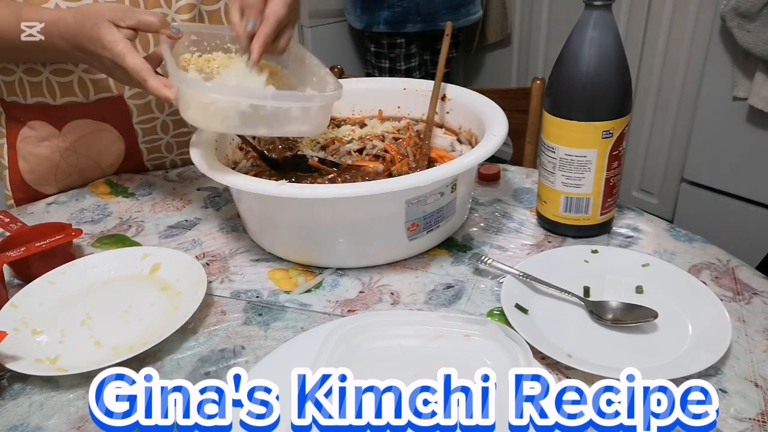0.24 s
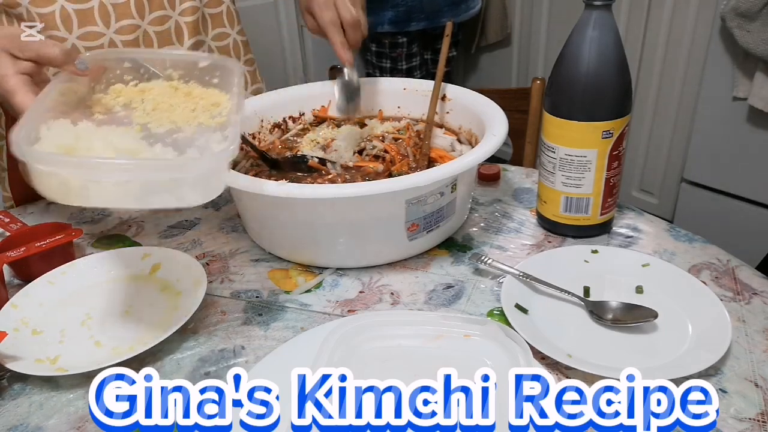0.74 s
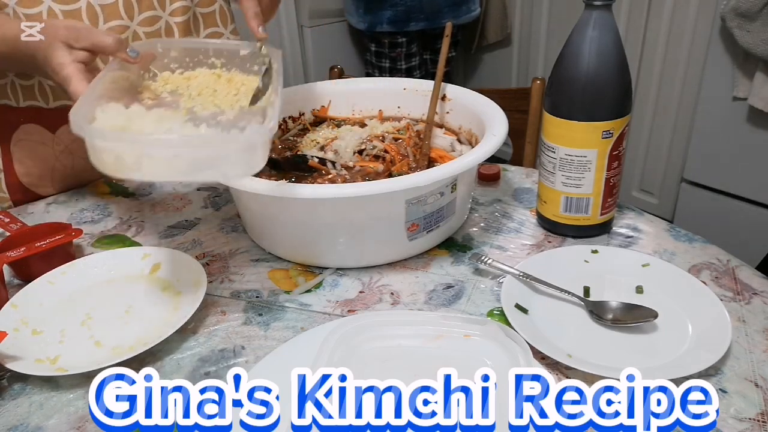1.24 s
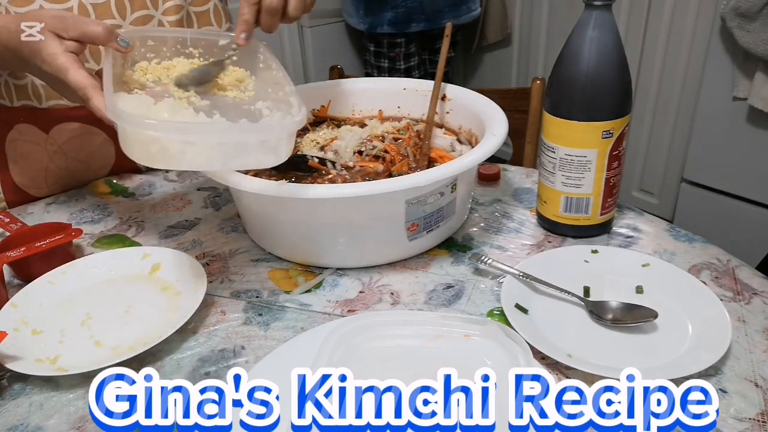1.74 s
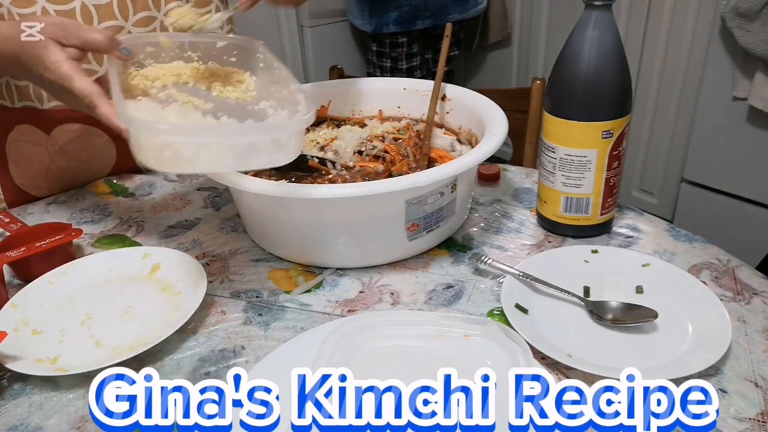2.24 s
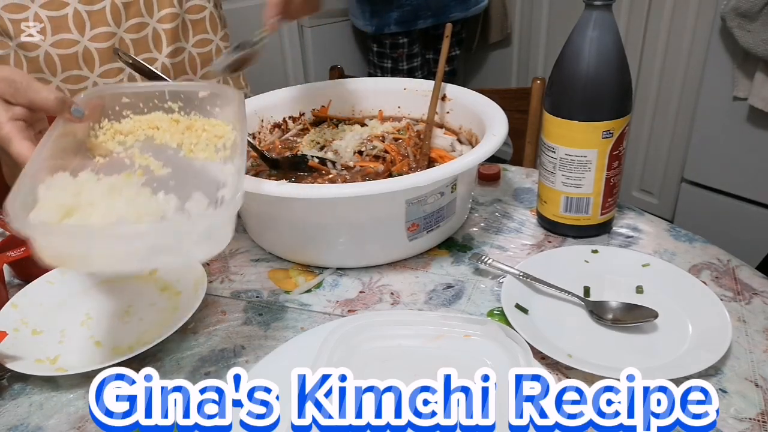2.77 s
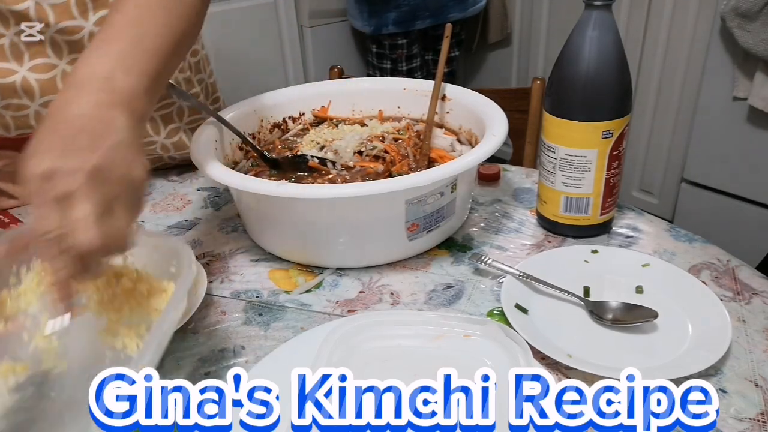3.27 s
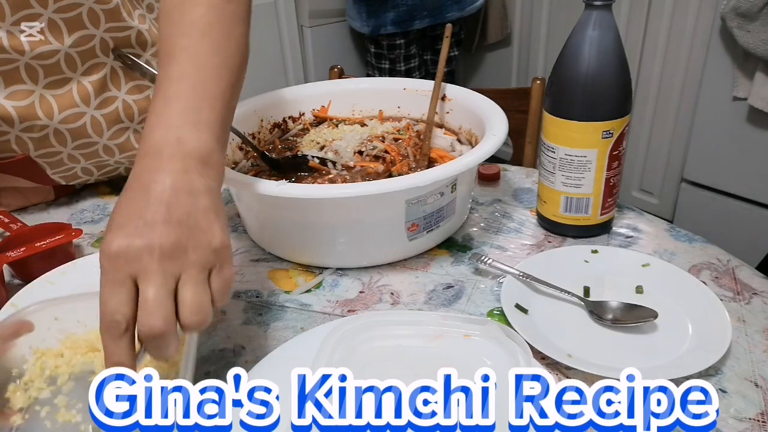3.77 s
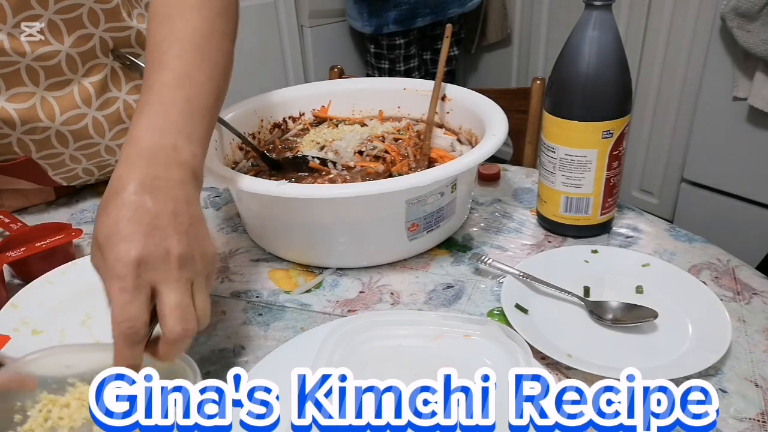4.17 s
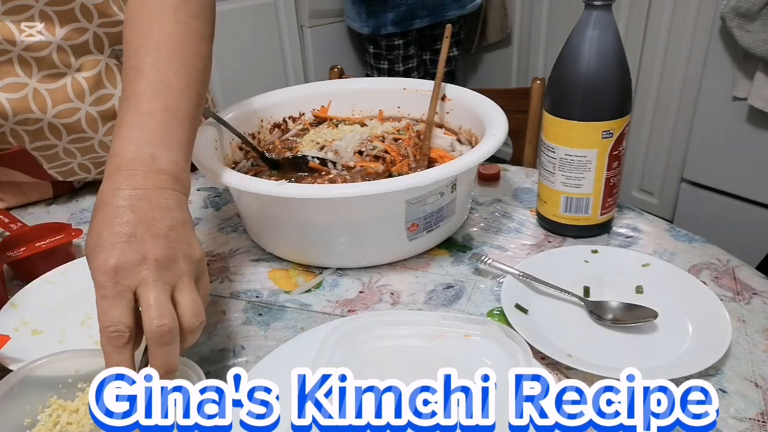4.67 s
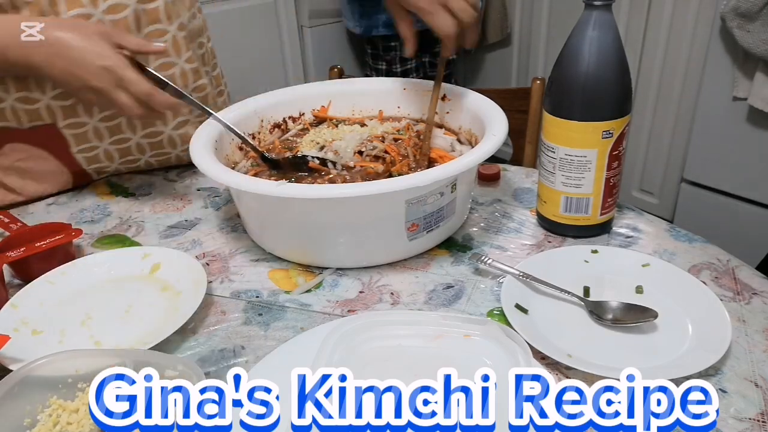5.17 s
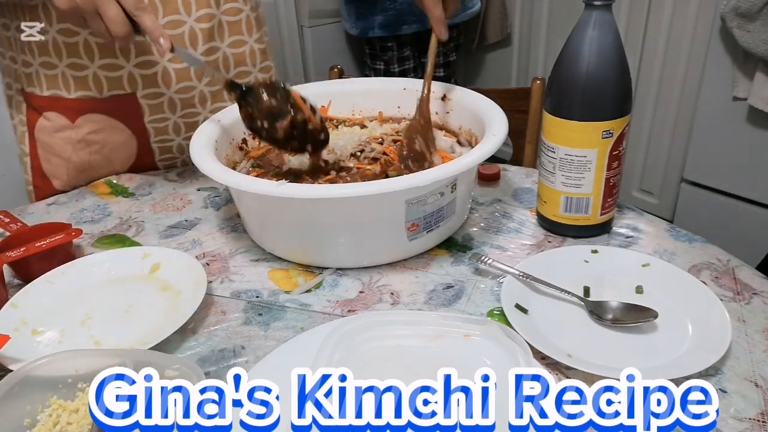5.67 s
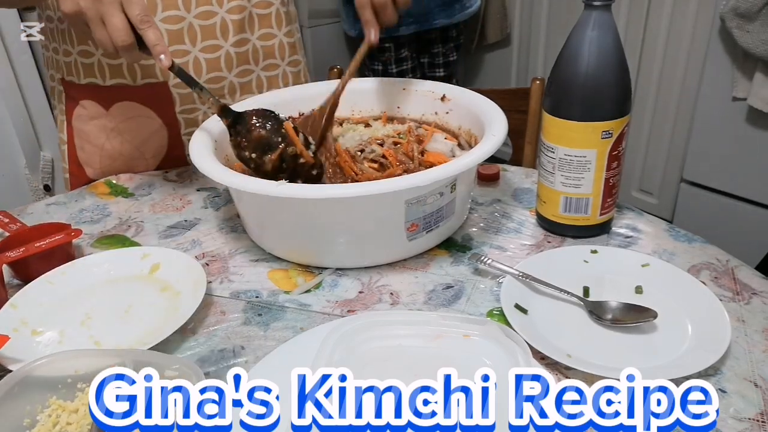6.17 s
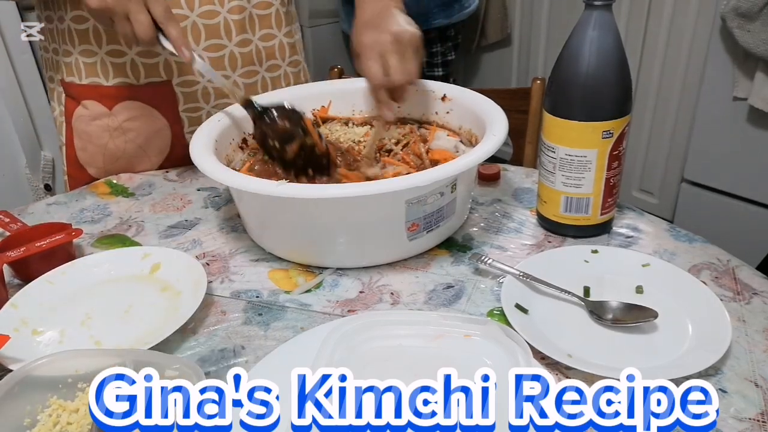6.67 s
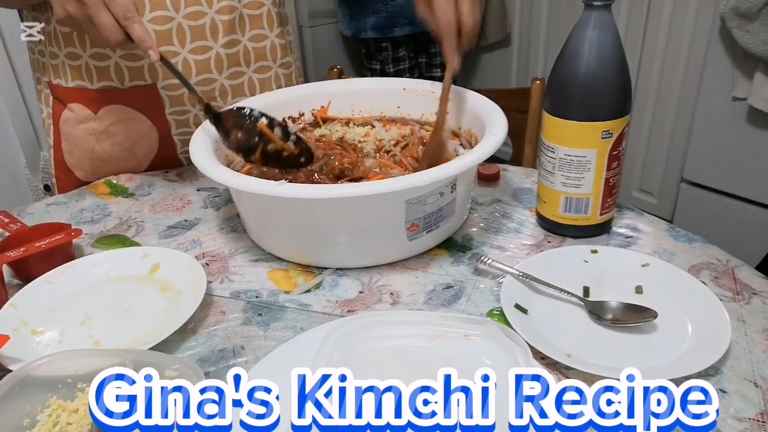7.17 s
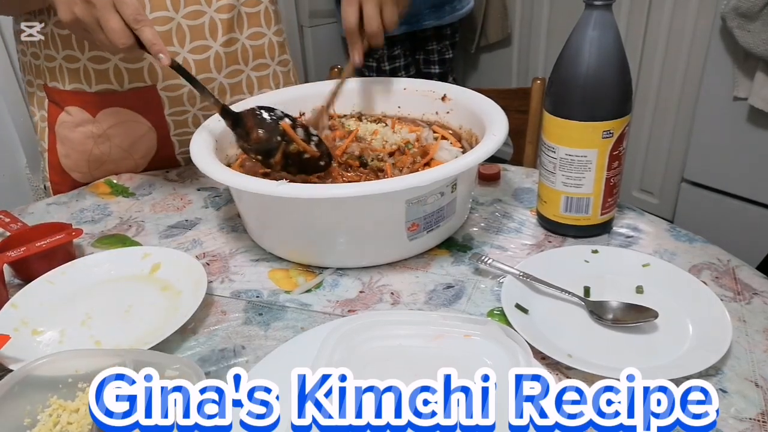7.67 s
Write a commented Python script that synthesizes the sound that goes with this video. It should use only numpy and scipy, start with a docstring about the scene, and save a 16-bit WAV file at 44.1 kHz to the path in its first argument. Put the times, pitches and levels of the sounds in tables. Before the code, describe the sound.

Close in a small home kitchen, a spoon knocks a light plastic tub, with one strong tap early on and small scrapes between. The tub is then set down with a rapid cluster of hard, hollow clacks and slides. After a quieter moment and a soft table nudge, spoons stir wet vegetables in a plastic basin with muted knocks, faint squeaks and tiny ticks. A very low hum stays underneath.

```python
"""A small kitchen: a spoon taps and scrapes a plastic tub, the tub is set down and slid on a cloth-covered
table, then two spoons turn wet vegetables in a plastic basin, over a very low motor hum.
Hits are short decaying pulses with ringing walls, table, plate and spoon; scrapes are dense slips dealt to
resonances; wet rustle is crackling noise; squeaks are rough gliding tones; echoes are noise tails."""
import sys
import numpy as np
from scipy import signal
from scipy.fft import rfft, irfft
from scipy.io import wavfile

SR = 44100
rng = np.random.default_rng(int(sys.argv[2]) if len(sys.argv) > 2 else 0)


def generate_wav(signal):
    """Clip the signal to [-1, 1] and save it as 16-bit WAV at the path in sys.argv[1]."""
    frames = np.transpose(np.atleast_2d(signal))
    scaled = np.clip(frames, -1, 1) * 32767
    pcm = np.round(scaled).astype(np.int16)
    wavfile.write(sys.argv[1], SR, pcm)


N = 349272  # length in samples

# Background. Colour of the room air: f/Hz, relative level/dB
AIR_COLOUR = [(21, -29.5), (35, -7.5), (57, -9.5), (81, -16), (149, -17), (212, -25), (310, -24.5),
              (489, -26), (1050, -26.5), (2020, -29), (3500, -34.5), (5700, -39.5), (9800, -44),
              (15000, -49)]
# Left-right likeness of the air (1 same, 0 unrelated, -1 opposite): f/Hz, likeness
AIR_LIKENESS = [(60, 0.5), (180, -0.088), (540, 0.27), (1620, -0.35), (4850, 0.081), (14600, -0.11)]
# The drone swells and sinks: t/s, level/dB
DRONE_SWELL = [(0, -72.5), (1.3, -73.5), (2.0, -73.5), (2.8, -69.5), (4.6, -77), (5.3, -66.5), (6.2, -73),
               (6.7, -72), (7.2, -76), (7.6, -71)]
AIR_DB = -64
HUM_HZ, HUM_DB, HUM_SIDE_RAD = 29.4, -56.5, 0.2
DRONE_HZ, DRONE_WIDTH_HZ, DRONE_OCTAVE_DB = 146.9, 9.7, -9  # a wider band wavers faster

# Decay of the kitchen echoes: f/Hz, t60/s
KITCHEN_DECAY = [(150, 0.54), (500, 0.2), (1000, 0.22), (2000, 0.22), (4000, 0.2), (10000, 0.14)]
KITCHEN_DB, KITCHEN_GAP_S = -2, 0.004
EARLY_T60_S, EARLY_DB = 0.035, 1.5  # nearby table top and dishes: echoes that die fast
KITCHEN_TURN_S = 0.23  # time to fade from one random echo tail to the other, so no single colour lingers

# The table is nudged: t/s, push level/dB
BUMP_HITS = [(5.27, -48), (5.37, -50), (5.9, -48), (5.97, -48.5)]
BUMP_HZ, BUMP_T60_S = 65, 0.24
TABLE_HZ, TABLE_T60_S = 138, 0.39

# Modes of a plate under the tub: f/Hz, level/dB, t60/s
PLATE_MODES = [(2665, -3, .03), (3150, -6, .025), (4270, -7, .018), (5250, -8, .03)]
# Blows on the plate: t/s, level/dB, extra level of every second mode/dB (depends on where it is struck)
PLATE_BLOWS = [(3.641, -26.5, -13), (3.906, -49.5, 9)]
# Modes of the metal spoon: f/Hz, level/dB, t60/s
SPOON_MODES = [(2480, 5, 0.027), (3520, 0.5, 0.042)]
# Spoon clinks: t/s, level/dB
SPOON_CLINKS = [(0.027, -43.5), (6.841, -62)]
# The tub rocks and its floor rings: t/s, level/dB, f/Hz, decay/cycles
TUB_RATTLES = [(1.863, -53, 1524, 3.7), (2.284, -43, 1520, 1.7), (2.394, -51, 1500, 3.5),
               (3.3328, -39, 950, 0.9), (3.339, -48, 2000, 0.77), (3.3, -43, 1490, 1.7),
               (3.641, -20, 1124, 1.14), (3.644, -37, 1950, 2.4), (3.987, -28.5, 1020, 0.87),
               (4.015, -17, 1180, 1.06), (4.033, -26.5, 2080, 2.4), (4.048, -30, 1060, 1.8),
               (4.056, -40, 1900, 1.3), (4.084, -47, 696, 1.1), (4.106, -51, 1180, 1),
               (4.11, -42, 4350, 3.5), (4.175, -55, 1270, 1.7), (4.323, -38, 1320, 1.3),
               (4.436, -20.5, 1340, 0.56), (5.137, -50, 1370, 4.1), (6.36, -37, 3000, 0.57),
               (6.566, -40, 1650, 3.7), (6.84, -50, 3140, 2.8), (6.84, -44, 3870, 2.3),
               (6.856, -58, 3500, 2.5)]

# A sliding spoon holds one resonance: start t/s, length/s, level/dB, start f/Hz, end f/Hz
SPOON_SQUEAKS = [(0.607, 0.064, -78, 1550, 1450), (4.116, 0.027, -54.5, 2090, 2150),
                 (4.83, 0.037, -69, 944, 1130), (4.904, 0.11, -71.5, 1350, 1390),
                 (5.037, 0.053, -63.5, 1358, 1410), (5.18, 0.032, -65.5, 1400, 1410),
                 (5.03, 0.1, -74, 2140, 1990), (5.172, 0.053, -69, 2160, 2240),
                 (6.084, 0.082, -70, 1010, 1043), (6.137, 0.029, -73, 2490, 2424),
                 (6.198, 0.02, -69, 1597, 1660), (6.44, 0.16, -70, 2100, 2030),
                 (6.6, 0.092, -71, 1616, 1550), (6.738, 0.092, -75, 2930, 3000)]
SQUEAK_POLE_WIDTH_HZ, SQUEAK_EDGE_S = 190, 0.0093

# Tiny bright ticks, alone or on the edge of knocks and scuffs: t/s, level/dB, f/Hz
TINY_POPS = [(0.799, -40, 8750), (0.805, -48.5, 3800), (0.812, -38, 10500), (1.591, -47.5, 6500),
             (2.57, -56.5, 5430), (3.339, -38.5, 5350), (3.343, -40.5, 9000), (4.015, -28.5, 3940),
             (4.033, -36, 4450), (4.307, -41, 5800), (4.313, -42, 5200), (4.322, -32.5, 5700),
             (4.332, -35.5, 5200), (4.436, -40, 4800), (4.45, -50, 5200), (5.972, -52.5, 3300),
             (5.972, -51, 8000), (6.146, -53, 2420), (6.321, -54, 6600), (6.453, -53, 5350),
             (6.571, -32.5, 5200), (6.6543, -48, 5050), (6.733, -50.5, 3000), (6.818, -59, 6000),
             (6.84, -40, 3770), (7.013, -56.5, 3550), (7.1302, -57.5, 7600), (7.372, -51, 6500),
             (7.447, -53.5, 5500), (7.49, -50, 4640), (7.573, -48, 9900)]
POP_SPLINTER_S = 0.0069

# Spoon strokes and drags: start t/s, length/s, scrape level/dB, scrape centre at start f/Hz, wet rustle level/dB
SPOON_STROKES = [(-0.005, 0.014, -66.5, 2420, -65), (0.429, 0.12, -69, 900, -85),
                 (0.624, 0.097, -71, 1670, -73), (0.882, 0.07, -65.5, 2000, -70),
                 (1.153, .07, -71.5, 2170, -77), (1.227, 0.011, -64, 760, -68),
                 (1.445, 0.17, -81, 766, -67.5), (1.586, 0.047, -85, 1000, -72),
                 (1.76, 0.19, -74, 1200, -73.5), (2.184, 0.023, -79, 1470, -62.5),
                 (2.576, 0.12, -73.5, 683, -73.5), (2.83, 0.15, -72.5, 1470, -78),
                 (3.08, 0.03, -69, 705, -68), (3.299, 0.039, -60, 1010, -59),
                 (3.757, 0.031, -62, 1050, -75), (3.79, 0.035, -66, 1510, -71), (3.94, .1, -56, 1140, -61),
                 (4.035, 0.029, -46, 1500, -54), (4.293, 0.057, -63, 1040, -61.5),
                 (4.816, 0.23, -68.5, 790, -79.5), (5.013, 0.18, -66.5, 1400, -72),
                 (5.299, 0.097, -62.5, 1430, -66), (5.93, 0.063, -64.5, 1110, -68.5),
                 (6.082, 0.15, -73.5, 960, -72), (6.434, 0.12, -68, 2300, -67),
                 (6.57, 0.033, -61, 1500, -59.5), (6.648, 0.025, -64, 2400, -72),
                 (6.741, 0.048, -63, 730, -72.5), (6.835, 0.036, -63.5, 720, -67.5),
                 (7.203, 0.18, -74.5, 1070, -70.5), (7.436, 0.11, -85, 1540, -70),
                 (7.668, 0.15, -78, 1540, -77), (7.83, 0.067, -74, 716, -71)]
# Colour of the wet rustle: f/Hz, relative level/dB
RUSTLE_COLOUR = [(1500, -7), (2500, 3), (3600, -7), (4800, -3.5), (6500, -3.5), (9800, -6), (15000, -18)]
STROKE_RISE_DB_PER_S, STROKE_FALL_DB_PER_S = 271, 132
STROKE_GLIDE_OCTAVES_PER_S = 0.93  # the centre climbs as the spoon travels up the wall
SLIP_CYCLES = 20  # t60 of each slip resonance, in its own cycles
SLIP_FOCUS_DB, SLIP_BROAD_DB = -25, -13  # fall per squared octave from the centre, and its floor
# Faint fumbling between strokes
HANDLING_DB, HANDLING_RUSTLE_DB, HANDLING_HZ, HANDLING_WAVER_DB = -92.5, -82.5, 1200, 3

# Clear blows: t/s, level/dB, wall f/Hz, then relative to that level: table thump level/dB,
# clack level/dB, bright edge level/dB
KNOCK_CONTACTS = [(0.027, -60.5, 392, 6, 9, 6.5), (0.409, -42, 1260, -37, -29, -46),
                  (0.478, -41.5, 1110, -41, -34, -51), (1.221, -20, 755, -52, -29, -58),
                  (1.429, -34.5, 606, -38, -9.5, -16.5), (1.86, -54, 1020, -16, -2.5, -10.5),
                  (2.281, -56.5, 1290, -33, 4, -50), (2.391, -46.5, 950, -37, -20, -43),
                  (3.082, -38, 500, -45, -22, -33.5), (3.164, -34.5, 705, -54, -5, -12),
                  (3.529, -39.5, 880, -49, -17.5, -34), (3.636, -33.5, 910, -1, -3, -17.5),
                  (3.64, -31.5, 1130, -17.5, -1.5, -45), (3.71, -24.5, 930, -17.5, -23, -35),
                  (3.835, -44.5, 1050, -16, -16, -29), (3.87, -48, 1260, -19, -17, -36.5),
                  (3.906, -36.5, 1170, -9.5, -3, -16.5), (3.951, -30.5, 1130, -18, -23, -51),
                  (3.979, -33.5, 1200, -8.5, -26, -23.5), (4.0155, -31, 1160, -24, -7, -31),
                  (4.032, -38, 560, -41, 7, -31), (4.056, -33.5, 583, -8, 1, -32),
                  (4.227, -46, 366, -1.5, -10.5, -38), (4.275, -48.5, 760, -33, -7.5, -27),
                  (4.4355, -24.5, 620, -29.5, -23, -46), (5.135, -40.5, 1250, -38, -20, -34.5),
                  (5.299, -49, 1080, -8, -7, -37), (5.325, -50.5, 1310, 1, -6, -22),
                  (5.9, -39.5, 427, -10, -13, -30), (6.198, -52.5, 650, -21, -8, -32),
                  (6.734, -36.5, 664, -31, -15, -33), (6.805, -40.5, 510, -17.5, -34, -42),
                  (6.839, -42, 523, -49, -29, -13), (7.276, -70.5, 790, -27, 6, 2)]
# Scuffs, where the contact drags on: the same columns as the clear blows
SCUFF_CONTACTS = [(0.437, -47.5, 636, -45, -21, -53), (0.679, -55.5, 1360, -40, 1.5, -39),
                  (0.892, -50.5, 775, -13.5, -28, -18), (0.921, -59.5, 1320, -15, 9.5, -15),
                  (1.235, -53, 743, -44, 3, -3.5), (1.768, -60.5, 1420, -22, 4, -19),
                  (2.239, -48, 1050, -33, -36, -32), (3.297, -53, 1200, -27, 6, -5.5),
                  (3.334, -39, 910, -25, -12, -23), (3.483, -54.5, 695, -42, -4, -15.5),
                  (3.986, -28, 800, -23, -11, -49), (4.02, -29.5, 1200, -10.5, -13, -32),
                  (4.07, -33.5, 1060, -44, -18, -26), (4.11, -42.5, 1100, -24, -12, -16),
                  (4.15, -49.5, 1200, -26, -10, -13), (4.303, -40, 990, -47, -4, -12.5),
                  (4.319, -38.5, 770, -2, -2.5, -30), (4.813, -53.5, 1100, -15, -13, -27),
                  (5.276, -50.5, 1100, -31, -2.5, -14.5), (5.969, -63, 1110, 5, -14, -12),
                  (6.563, -39, 1850, -20, -29, -13.5), (7.894, -52, 443, -13, -17, -34)]
# Plastic walls of the tub: f/Hz, relative level/dB, t60/s
TUB_WALLS = [(420, -1.5, 0.017), (564, -6, 0.04), (782, -14, 0.028), (951, -5, 0.022), (1250, -5, 0.018),
             (1830, -6, 0.02), (2400, -5, 0.018), (3000, -5, 0.016)]
# The work moves from the tub on the left to the basin: t/s, left minus right level/dB
WORK_PLACE = [(0, 0.5), (1.3, 0.9), (3.3, 1.3), (4.0, 1.5), (4.3, 0.5), (5.1, 10.5), (5.4, -1.5), (6.0, -2),
              (7.92, -3)]
LAG_SAMPLES = 4
REBOUND_S, SCUFF_S = 0.016, 0.035
# A stronger clack is a harder contact and sits higher
CLACK_HZ, CLACK_KNEE_DB, CLACK_OCTAVES_PER_DB = 1496, -5, 0.065
SNAP_HZ, TICK_HZ = 3690, 5730  # the two pulses of the bright edge
# The shorter a pulse, the higher it stands over its band level
CLACK_CREST_DB, SNAP_CREST_DB, TICK_CREST_DB = 14.5, 19, 26

# Response of the microphone: f/Hz, level/dB
MICROPHONE_RESPONSE = [(5500, -0.5), (7000, -3), (8300, -5), (9800, -1), (11500, -5), (15000, -9.5)]
CUTOFF_HZ = 15500


def from_db(db):
    """Decibels to gain."""
    return 10 ** (np.asarray(db) / 20)


def rms_one(x):
    """Scale to rms 1."""
    return x / np.sqrt(np.mean(x ** 2) + 1e-20)


def at_hz(points, hz):
    """Read a table on a log-frequency axis."""
    points = np.array(points)
    return np.interp(np.log(hz), np.log(points[:, 0]), points[:, 1])


def over_time(points, t):
    """Read a table of time and level."""
    return np.interp(t, *np.transpose(points))


def spectrum_hz():
    """Frequencies of the full-length spectrum, held above 10 Hz for the log axis."""
    return np.maximum(np.arange(N // 2 + 1) * SR / N, 10)


def drift(rate):
    """Slow random wander of rms 1: smoothed noise, drawn every 40 samples."""
    r = np.exp(-80 * np.pi * rate / SR)
    noise = rng.standard_normal(N // 40 + 2002)
    slow = signal.lfilter([1], [1, -2 * r, r * r], noise)[2000:]
    return np.interp(np.arange(N) / 40, np.arange(len(slow)), rms_one(slow))


def ring(x, hz, t60):
    """A resonance: a unit click sets a decaying sine of about height 1 ringing."""
    r, w = from_db(-60 / (t60 * SR)), 2 * np.pi * hz / SR
    return signal.lfilter([0, np.sin(w)], [1, -2 * r * np.cos(w), r * r], x + 1e-18)


def coloured(x, spectrum):
    """Give a signal the colour of a spectrum; rms 1."""
    return rms_one(irfft(rfft(x) * from_db(at_hz(spectrum, spectrum_hz())), N))


def pair(likeness):
    """Two channels of noise, mixed from mid and side for the given likeness per frequency."""
    alike = np.clip(at_hz(likeness, spectrum_hz()), -1, 1)
    mid, side = rfft(rng.standard_normal((2, N)))
    return irfft(np.sqrt(1 + alike) * mid + np.sqrt(1 - alike) * side * [[1], [-1]], N)


def grains(per_s, spread_db):
    """Random clicks of uneven size, in clumps."""
    sizes = from_db(spread_db * np.minimum(rng.exponential(1, N), 4))
    signs = rng.choice([-1, 1], N)
    chance = per_s * from_db(4.0 * drift(20)) / SR
    return sizes * signs * (rng.random(N) < chance)


def pulse(hz, cycles):
    """A contact of a few cycles with a soft start; height 1."""
    turns = np.arange(600) * hz / SR
    shape = -turns * np.exp(-turns / cycles) * np.sin(2 * np.pi * turns)
    return shape / np.abs(shape).max()


def strikes(hits):
    """A click train from rows of time and level."""
    clicks = np.zeros(N)
    for s, level_db in hits:
        clicks[round(s * SR)] = from_db(level_db)
    return clicks


def scatter(late, strength, length_s):
    """Small clicks strewn over a time, swelling quickly and fading; one at the very start stays whole."""
    clicks = np.zeros(4000)
    swell = np.where(late > 0, np.minimum(late / 0.072, 1), 1)
    at = np.clip(late * length_s * SR, 0, 3999).astype(int)
    np.add.at(clicks, at, strength * swell * np.exp(-1.5 * late))
    return clicks


def side_gains(s, level_db):
    """Left and right gain of a sound made where the work is at that moment."""
    return from_db(level_db + np.array([[.5], [-.5]]) * over_time(WORK_PLACE, s))


def hum():
    """A very low, nearly steady motor tone: one sine, shifted in phase between the sides."""
    side = HUM_SIDE_RAD * np.array([[1], [-1]])
    tone = np.sin(2 * np.pi * HUM_HZ * np.arange(N) / SR + side)
    return from_db(HUM_DB + .5 * drift(0.76)) * np.sqrt(2) * tone


def drone():
    """A wavering drone near the hum's fifth and tenth multiples: noise driving two narrow resonances."""
    out = 0
    for octave in range(2):
        noise = rng.standard_normal(N)
        band = ring(noise, DRONE_HZ * 2 ** octave, 2.0 / DRONE_WIDTH_HZ)
        out = out + from_db(octave * DRONE_OCTAVE_DB) * rms_one(band)
    return out * from_db(over_time(DRONE_SWELL, np.arange(N) / SR))


def air():
    """The air of the room: coloured stereo noise that drifts slightly in level."""
    return from_db(AIR_DB + 1.0 * drift(0.59)) * coloured(pair(AIR_LIKENESS), AIR_COLOUR)


def kitchen(x):
    """A diffuse noise tail per side that builds up after a gap and dies band by band."""
    t, tail = np.arange(SR // 2) / SR, 0
    alike = [0.66, 0.54, 0.035, 0.0065, 0.016, 0.0031, 0.07]  # the bass is more alike on both sides
    for low, share in zip(170 * 2. ** np.arange(8), alike):
        common = np.sqrt(share) * rng.standard_normal(len(t))
        noise = common + np.sqrt(1 - share) * rng.standard_normal((2, len(t)))
        octave = signal.butter(2, [low, min(2 * low, .45 * SR)], "band", fs=SR, output="sos")
        late_decay = from_db(-60 * t / at_hz(KITCHEN_DECAY, low * np.sqrt(2)))
        early_decay = from_db(EARLY_DB - 60 * t / EARLY_T60_S)
        tail = tail + signal.sosfilt(octave, noise) * (late_decay + early_decay)
    tail = tail * np.clip(t / KITCHEN_GAP_S - .5, 0, 1)
    tail = tail / np.sqrt(np.sum(tail ** 2, axis=1, keepdims=True))
    return from_db(KITCHEN_DB) * signal.fftconvolve(x, tail, axes=1)[:, :N]


def bumps():
    """Nudges of the table: softened pushes ring a low mode of the top."""
    push = signal.lfilter([.015], [1, -.985], strikes(BUMP_HITS))
    return ring(push, BUMP_HZ, BUMP_T60_S)


def plate():
    """A plate under the tub rings briefly, its modes balanced by where it is struck."""
    out = 0
    for k, (hz, level_db, t60) in enumerate(PLATE_MODES):
        hits = [(s, db + k % 2 * odd_db) for s, db, odd_db in PLATE_BLOWS]
        out = out + from_db(level_db) * ring(strikes(hits), hz, t60)
    return out


def spoon():
    """The metal spoon clinks where it meets an edge: each click rings its modes."""
    clicks = strikes(SPOON_CLINKS)
    return sum(from_db(level_db) * ring(clicks, hz, t60) for hz, level_db, t60 in SPOON_MODES)


def rattles():
    """Short rings of the rocking tub's floor, placed like the knocks."""
    out = np.zeros((2, N + 600))
    for s, level_db, hz, cycles in TUB_RATTLES:
        out[:, round(s * SR):][:, :600] += side_gains(s, level_db) * pulse(hz, cycles)
    out[1] = np.roll(out[1], LAG_SAMPLES)
    return out[:, :N]


def squeaks():
    """Rough narrow tones: a gliding sine whose height and phase wander within a narrow width."""
    out, r = np.zeros(N), np.exp(-np.pi * SQUEAK_POLE_WIDTH_HZ / SR)
    wander = rms_one(signal.lfilter([1], [1, -2 * r, r * r], rng.standard_normal((2, N))))
    for s, length_s, level_db, start_hz, end_hz in SPOON_SQUEAKS:
        first, last = s - SQUEAK_EDGE_S, s + length_s + 3 * SQUEAK_EDGE_S
        at = np.arange(round(first * SR), round(last * SR))
        t = at / SR - s
        rise, fall = 1 + t / SQUEAK_EDGE_S, 1 + (length_s - t) / (3 * SQUEAK_EDGE_S)
        shape = np.clip(np.minimum(rise, fall), 0, 1) ** 2
        glide_hz = start_hz + (end_hz - start_hz) * np.clip(t / length_s, 0, 1)
        phase = 2 * np.pi * np.cumsum(glide_hz) / SR
        tone = wander[0, at] * np.cos(phase) + wander[1, at] * np.sin(phase)
        out[at] += from_db(level_db) * shape * tone
    return out


def pops():
    """Tiny bright ticks, alone or on the edge of knocks and scuffs, each at its own pitch and splintering."""
    out = np.zeros(N + 5000)
    late, strength = rng.random((len(TINY_POPS), 10)), 0.58 * rng.standard_normal((len(TINY_POPS), 10))
    late[:, 0], strength[:, 0] = 0, 1  # the first tick is whole
    for (s, level_db, hz), a, b in zip(TINY_POPS, late, strength):
        tick = np.convolve(scatter(a, b, POP_SPLINTER_S), pulse(hz, cycles=0.7))
        out[round(s * SR):][:len(tick)] += from_db(level_db) * tick
    return out[:N]


def strokes():
    """Each stroke rises, holds and falls over the faint fumbling; the loudest one sets the centre."""
    t = np.arange(N) / SR
    scrape = from_db(HANDLING_DB + HANDLING_WAVER_DB * drift(1.3))
    rustle = from_db(HANDLING_RUSTLE_DB + HANDLING_WAVER_DB * drift(17.0))
    centre_hz = np.full(N, float(HANDLING_HZ))
    for s, length_s, level_db, hz, wet_db in SPOON_STROKES:
        rise_db = np.minimum(STROKE_RISE_DB_PER_S * (t - s), 0)
        shape_db = np.minimum(rise_db, STROKE_FALL_DB_PER_S * (s + length_s - t))
        stroke = from_db(level_db + shape_db)
        climbing_hz = hz * 2 ** (STROKE_GLIDE_OCTAVES_PER_S * np.clip(t - s, 0, length_s))
        centre_hz = np.where(stroke > scrape, climbing_hz, centre_hz)
        scrape = np.maximum(scrape, stroke)
        rustle = np.maximum(rustle, from_db(wet_db + shape_db))
    return scrape, centre_hz * 2 ** (0.28 * drift(12.0)), rustle


def rubbing():
    """Dense slips on plastic, dealt to short resonances around a moving centre, and a wet crackle above."""
    scrape_gain, centre_hz, rustle_gain = strokes()
    slips, dealt, scrape = grains(4000, spread_db=4.5), rng.integers(0, 22, N), 0
    for k, hz in enumerate(np.geomspace(400, 4500, 22)):
        # the resonance under the spoon is driven most
        focus_db = SLIP_FOCUS_DB * np.log2(hz / centre_hz) ** 2
        drive = slips * from_db(np.maximum(focus_db, SLIP_BROAD_DB)) * (dealt == k)
        scrape = scrape + np.sqrt(hz) * ring(drive, hz, SLIP_CYCLES / hz)
    scrape = scrape_gain * rms_one(scrape)
    crackle = np.array([grains(5000, spread_db=7.5) for side in "LR"])
    rustle = rustle_gain * coloured(crackle, RUSTLE_COLOUR)
    return scrape * from_db([[.7], [-.7]]) + rustle


def walls(x):
    """The plastic walls ring on after a contact: a bank of short modes of alternating sign."""
    out = 0
    for k, (hz, level_db, t60) in enumerate(TUB_WALLS):
        out = out + (-1) ** k * from_db(level_db) * ring(x, hz, t60)
    return out


def table_thump(push):
    """The table answers low: a push softened by the cloth rings four modes."""
    push = -signal.sosfilt(signal.butter(2, [100, 450], "band", fs=SR, output="sos"), push)
    modes = [(TABLE_HZ, -3.5, TABLE_T60_S), (161.0, -8.0, 0.22), (297.0, 9.0, 0.012), (401, 6.0, 0.01)]
    return sum(from_db(level_db) * ring(push, hz, t60) for hz, level_db, t60 in modes)


def contacts(table, chatters):
    """Each contact is a wall pulse and three ever sharper ones, repeated by its chatter."""
    contact, push = np.zeros((2, N + 5000)), np.zeros(N)
    for row, chatter in zip(table, chatters):
        s, level_db, hz, thump_db, clack_db, edge_db = row
        at = round(s * SR)
        clack_hz = CLACK_HZ * 2 ** (CLACK_OCTAVES_PER_DB * max(clack_db - CLACK_KNEE_DB, 0))
        blow = pulse(hz, cycles=0.53)
        blow += from_db(clack_db + CLACK_CREST_DB) * pulse(clack_hz, cycles=0.37)
        blow += from_db(edge_db + SNAP_CREST_DB) * pulse(SNAP_HZ, cycles=0.49)
        blow += from_db(edge_db + TICK_CREST_DB) * pulse(TICK_HZ, cycles=0.33)
        blow = np.convolve(chatter, blow)
        contact[:, at:at + len(blow)] += side_gains(s, level_db) * blow
        push[at] = from_db(level_db + thump_db)
    contact[1] = np.roll(contact[1], LAG_SAMPLES)  # the sound reaches the left port first
    no_bass = signal.butter(2, 250, "high", fs=SR, output="sos")  # the contacts carry little below 250 Hz
    contact = signal.sosfilt(no_bass, contact[:, :N])
    return contact + from_db(-44.5) * walls(contact) + table_thump(push)


def scuffs():
    """Dragging contacts: a crowd of uneven slips with no single blow."""
    count = len(SCUFF_CONTACTS)
    late, strength = rng.random((count, 60)), 0.38 * rng.standard_normal((count, 60))
    return contacts(SCUFF_CONTACTS, [scatter(a, b, SCUFF_S) for a, b in zip(late, strength)])


def knocks():
    """Clear blows: one whole contact each and a few quick rebounds, mostly weaker."""
    count = len(KNOCK_CONTACTS)
    late, strength = rng.random((count, 6)), 0.24 * rng.standard_normal((count, 6))
    late[:, 0], strength[:, 0] = 0, 1
    return contacts(KNOCK_CONTACTS, [scatter(a, b, REBOUND_S) for a, b in zip(late, strength)])


def scene():
    """The background, the nudged table, the close work and its echoes through two alternating tails."""
    background = hum() + drone() + air()
    near = plate() + spoon() + rattles() + squeaks() + pops() + rubbing() + scuffs() + knocks()
    turn = np.pi * np.arange(N) / SR / KITCHEN_TURN_S / 2
    echoes = kitchen(near * np.cos(turn)) + kitchen(near * np.sin(turn))
    return background + bumps() + near + echoes


def record(dry):
    """The microphone port dips near 8 kHz and recovers near 10 kHz; the top is cut."""
    heard = irfft(rfft(dry) * from_db(at_hz(MICROPHONE_RESPONSE, spectrum_hz())), N)
    return signal.sosfilt(signal.cheby2(20, 70, CUTOFF_HZ, fs=SR, output="sos"), heard)


dry = scene()
out = record(dry)
generate_wav(out)
```